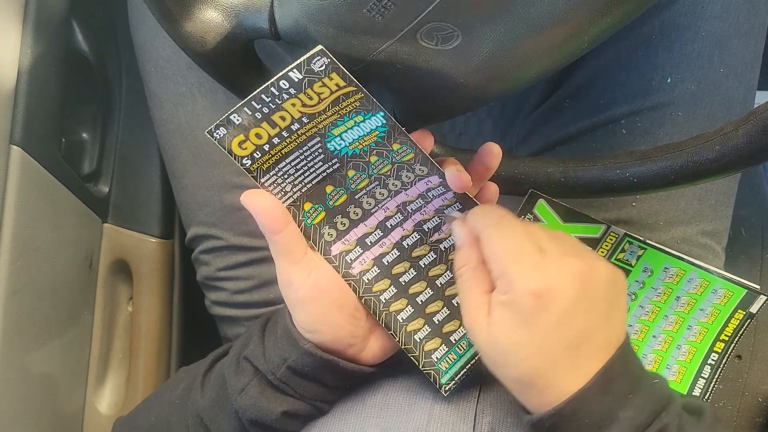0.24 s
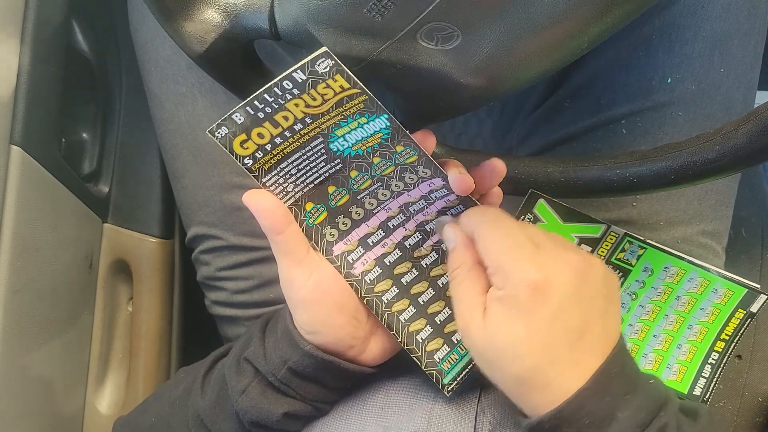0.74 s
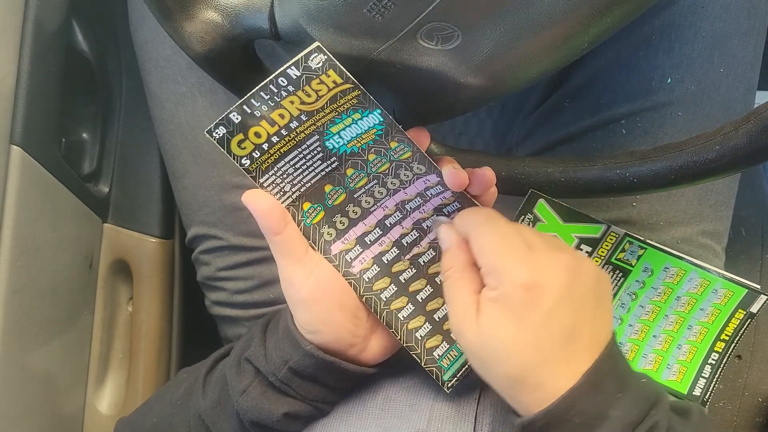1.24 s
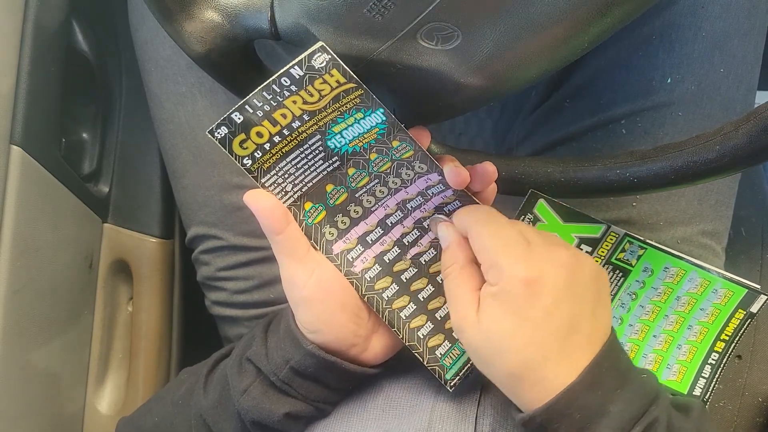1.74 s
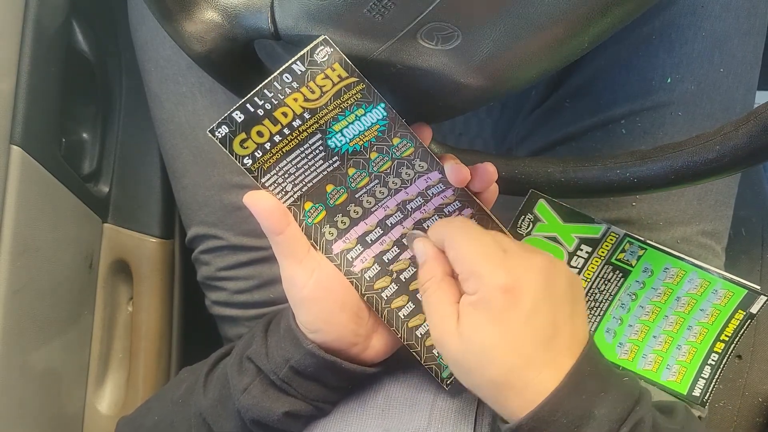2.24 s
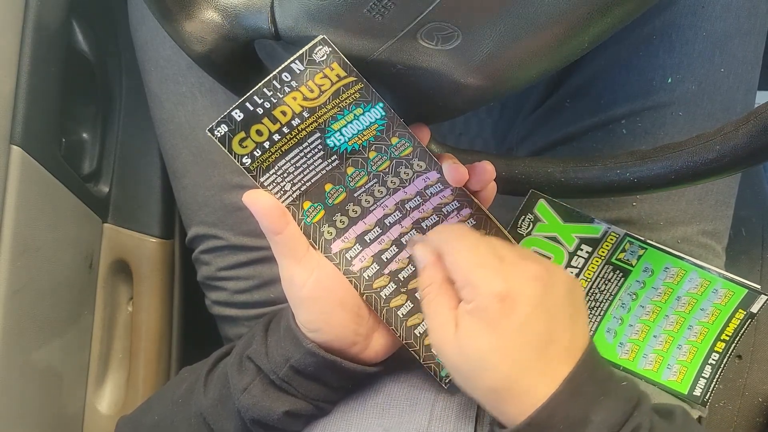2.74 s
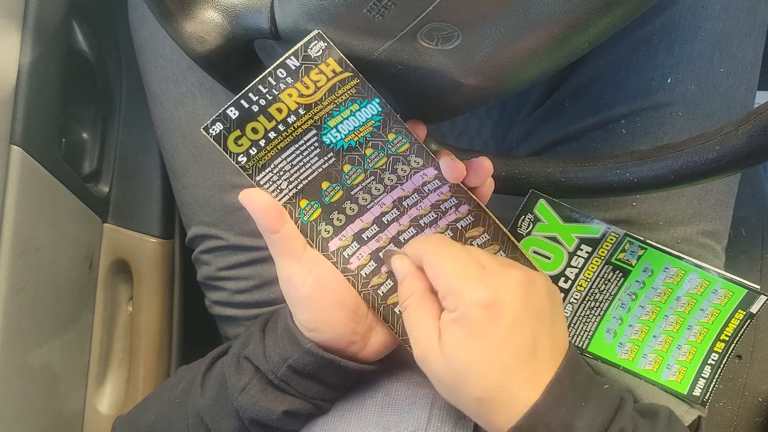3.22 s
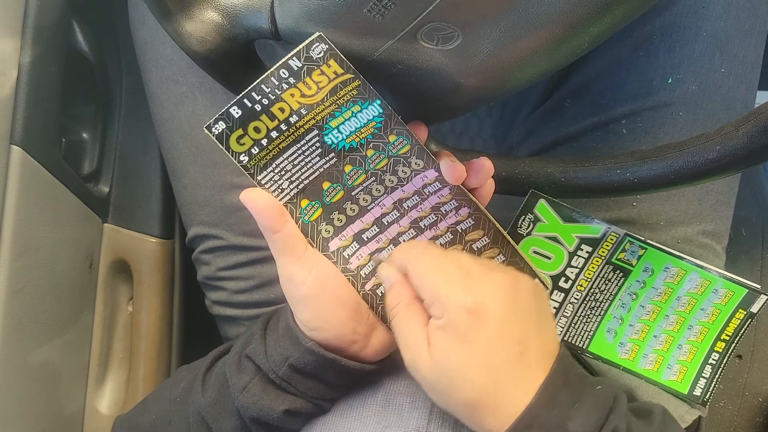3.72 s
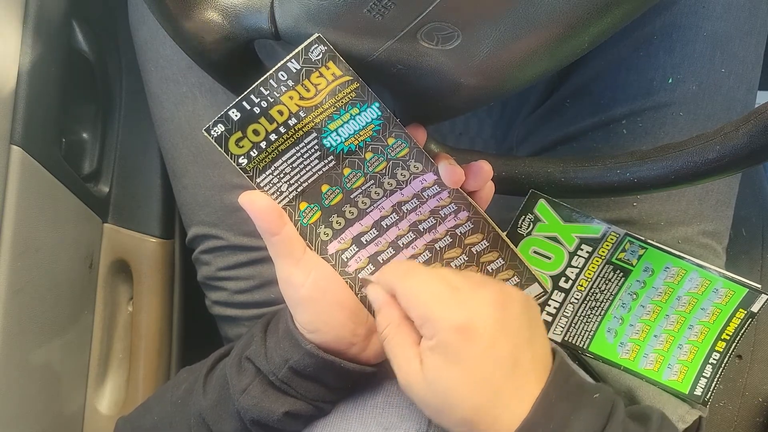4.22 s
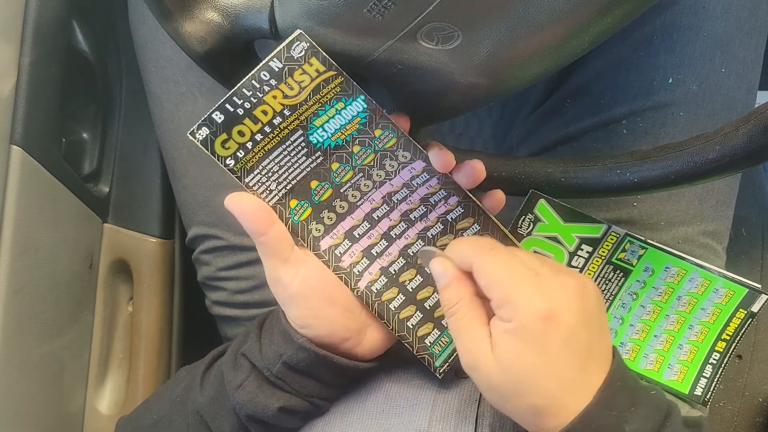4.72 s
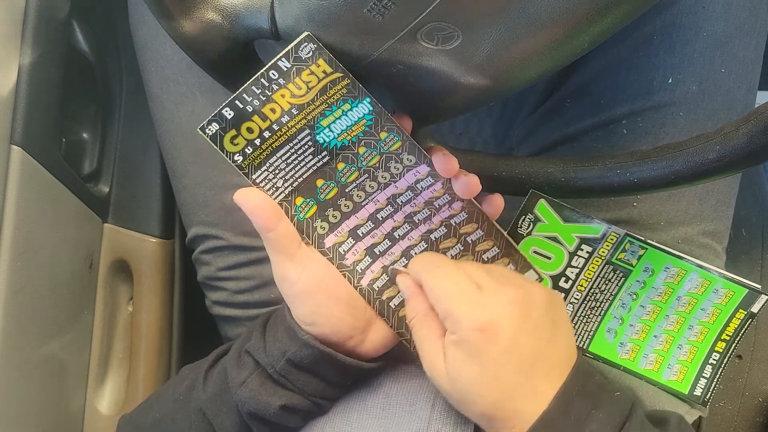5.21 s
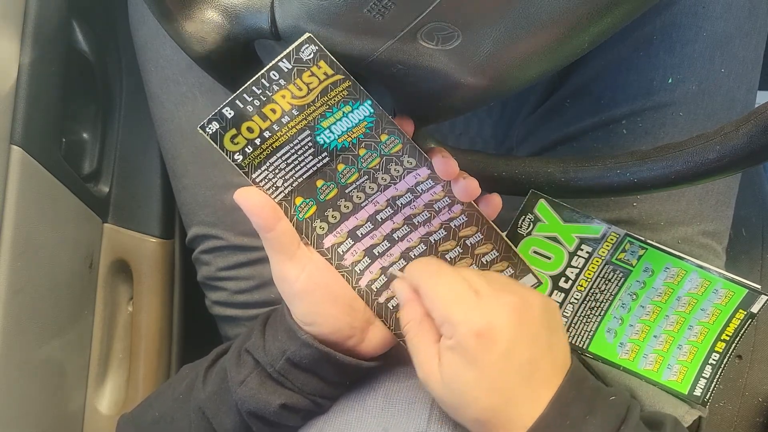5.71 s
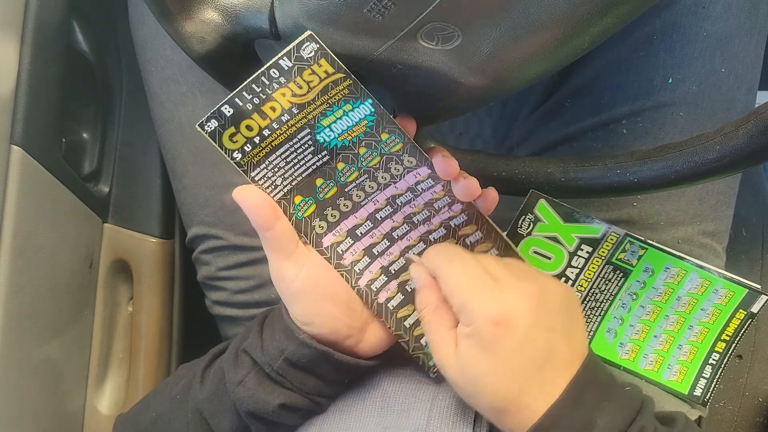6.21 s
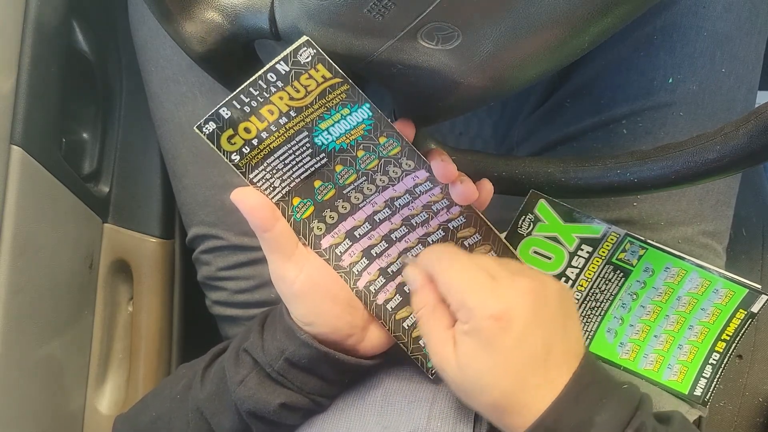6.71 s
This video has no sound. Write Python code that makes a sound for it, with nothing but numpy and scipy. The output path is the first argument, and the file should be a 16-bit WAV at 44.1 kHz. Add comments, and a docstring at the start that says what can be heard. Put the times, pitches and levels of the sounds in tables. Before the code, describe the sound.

Close, dry rasping runs in a fast, even rhythm as an edge rubs to and fro across a hand-held scratch card. The strokes vary in pressure and hiss, and little clicks are scattered among them. After a short break with a few faint taps, the scratching carries on. The microphone is nearby in a small padded car cabin with almost no echo and a continuous low rumble.

```python
"""Quick to-and-fro scratching, about eight strokes a second, on a lottery ticket held in one hand.
The scraping edge sticks and slips on the coating and shakes the card, whose resonances change as the
hand works down it; now and then the edge catches or the card flexes with a tick. Two microphones hear
it inside a parked car: the small padded cabin adds a very short ring, and a low rumble lies beneath."""
import sys
import numpy as np
from scipy import signal
from scipy.fft import rfft, irfft, next_fast_len
from scipy.io import wavfile
from scipy.ndimage import uniform_filter1d

SR = 44100
rng = np.random.default_rng(int(sys.argv[2]) if len(sys.argv) > 2 else 0)


def wav_record(signal):
    """Record a signal, one row per channel, as 16-bit PCM in the file named by sys.argv[1]."""
    frames = np.transpose(np.atleast_2d(signal))
    bounded = np.clip(frames, -1, 1)
    # unit amplitude maps onto the largest positive 16-bit level
    quanta = np.round(bounded * 32767).astype(np.int16)
    wavfile.write(sys.argv[1], SR, quanta)


N = 306495
EVENT_SIZE = 8192  # samples for one stroke or tick
USUAL_DB = -29.5  # crest of an ordinary stroke


# Strokes on the ticket; pushes tend to crest early, hissier pulls late. Each row: start in seconds,
# length in seconds, crest level in dB, place of the crest from 0 to 1, coating hiss in dB.
STROKES = [(0.051, 0.051, -27.5, 0.29, -1.5), (0.157, 0.089, -29, 0.59, -1.5),
           (0.318, 0.056, -30.5, 0.02, -2), (0.433, 0.072, -29, 0.65, 0), (0.566, 0.069, -29, 0.11, -2.5),
           (0.67, 0.097, -27.5, 0.57, 2), (0.819, 0.068, -28, 0.39, -4), (0.924, 0.058, -27, 1, -0.5),
           (1.057, 0.058, -34.5, 0.32, -5.5), (1.15, 0.086, -33, 0.64, -4), (1.287, 0.064, -30.0, 0.32, -1),
           (1.393, 0.084, -32, 0.82, -0.5), (1.531, 0.072, -29, 0.54, -2.5),
           (1.636, 0.078, -30.0, 0.57, -3.5), (1.775, 0.065, -32, 0.44, -1.5),
           (1.877, 0.09, -31, 0.62, -1.5), (2.027, 0.054, -32.5, 0.75, -0.5), (2.115, 0.085, -31.0, 0.7, 1),
           (2.264, 0.069, -30.0, 0.38, -2.5), (2.369, 0.076, -30, 0.72, 4), (2.501, 0.057, -32.5, 0.3, 2),
           (2.622, 0.061, -33, 0.67, 2.5), (2.738, 0.062, -35, 0.32, 1.0), (2.854, 0.068, -32.5, 0.58, 6.5),
           (2.993, 0.058, -34.5, 0.38, 3), (3.092, 0.093, -32.0, 0.41, 5.0),
           (3.244, 0.055, -25.5, 0.35, -1), (3.347, 0.072, -29.5, 0.61, 1),
           (3.472, 0.067, -28.5, 0.14, 1.5), (3.581, 0.07, -29.5, 0.69, 1.5),
           (3.701, 0.06, -26.5, 0.4, -1.5), (3.815, 0.058, -31, 0.56, -1), (3.953, 0.05, -31.5, 0.17, 0),
           (4.049, 0.066, -30, 0.81, -1.0), (4.17, 0.033, -28, 1.0, 1.5), (4.279, 0.066, -33.5, 0.67, 3.5),
           (4.393, 0.042, -29.5, 0.5, 1), (4.49, 0.076, -32.5, 0.66, -3.5), (4.604, 0.017, -35, 0.85, 4),
           (4.744, 0.086, -51, 0.36, 9.5), (5.115, 0.036, -44.5, 0.0, -4),
           (5.238, 0.063, -32.5, 0.26, -4.5), (5.367, 0.057, -33.5, 0.35, 1.5),
           (5.492, 0.054, -28.5, 0.29, -4), (5.604, 0.052, -33.5, 0.24, 1.5),
           (5.715, 0.06, -29.5, 0.52, -4.0), (5.836, 0.036, -30, 0.96, -0.5),
           (5.96, 0.051, -29.5, 0.01, -3.0), (6.077, 0.049, -30.0, 0.74, -1.5),
           (6.194, 0.067, -31, 0.91, -0.5), (6.34, 0.049, -31, 0, 3), (6.442, 0.09, -34.5, 0.72, 3),
           (6.579, 0.047, -30, 0, 5.5), (6.688, 0.071, -34.5, 0.44, 1), (6.817, 0.052, -32.5, 0.59, 3.5)]
def scratching():
    """All strokes, each with its own reflections as hand and card move."""
    out = np.zeros((2, N))
    for stroke in STROKES:
        add(out, stroke[0], cabin(scratch(*stroke)))
    return out


def scratch(s, length, crest_db, crest_place, hiss_db, slow_dull_db=-4.0, fine_hz=4000, run_up_s=0.019,
            edge_hz=3100, edge_width_hz=700, edge_per_db=0.43):
    """One stroke: the edge drags under changing pressure; its fine hiss needs speed, greatest halfway."""
    t, hz = np.arange(EVENT_SIZE) / SR, bins(EVENT_SIZE)
    pressure = edge_pressure(t, length, crest_db, crest_place)
    speed = np.sin(np.pi * np.minimum(t / length, 1))
    force = friction() * pressure
    fine = irfft(rfft(force) / (1 + (fine_hz / hz) ** 8), EVENT_SIZE)
    fine_gain = from_db(slow_dull_db * (1 - speed)) * np.minimum(t / run_up_s, 1)
    force = force - fine + fine * fine_gain
    # the harder the edge digs in, the more its own resonance stands out
    edge_db = edge_per_db * (crest_db - USUAL_DB) * resonance(hz, edge_hz, edge_width_hz)
    card_db = card_response(s, card_body_db(s, crest_db, hiss_db), hiss_db)
    rasp = causal_filter(force, card_db + edge_db)
    return unit_power(rasp) * np.sqrt(np.mean(pressure ** 2))


def edge_pressure(t, length, crest_db, crest_place, bite_s=0.0067, swell_db_s=351, ease_db_s=256,
                  swing_db=11, lift_db_s=855, linger_db=18, linger_db_s=368):
    """The edge bites, presses to a crest, eases and lifts quickly, though a light touch lingers."""
    past_crest, past_end = t - crest_place * length, np.maximum(t - length, 0)
    slack_db = swell_db_s * np.maximum(-past_crest, 0) + ease_db_s * np.maximum(past_crest, 0)
    slack_db = swing_db * np.tanh(slack_db / swing_db)
    lift_db = np.minimum(lift_db_s * past_end, linger_db + linger_db_s * past_end)
    return from_db(crest_db - slack_db - lift_db) * np.minimum(t / bite_s, 1)


def friction(slips_per_s=650, count=400, spread_db=2.5, powder_db=-3, chatter_db=1.9, chatter_per_s=220):
    """Uneven slips of the edge over a fine hiss of crumbling coating."""
    slip_at = (np.cumsum(rng.gamma(2, .5, count)) * SR / slips_per_s).astype(int)
    sizes = from_db(spread_db * np.clip(rng.standard_normal(count), -2, 2))
    slips = np.bincount(slip_at, sizes, EVENT_SIZE)[:EVENT_SIZE]
    force = unit_power(slips - slips.mean()) + from_db(powder_db) * rng.standard_normal(EVENT_SIZE)
    force *= from_db(chatter_db * np.clip(wander(EVENT_SIZE, chatter_per_s), -2, 2))
    # the hand keeps the mean drag steady
    return force / np.sqrt(uniform_filter1d(force ** 2, size=700) + 1e-9)


# How freely the card sounds as the grip shifts. Each row: time in seconds, body level in dB.
GRIP = [(0, 2.5), (1.2, -3.5), (2.03, -4.5), (2.15, 0), (3.05, .5), (3.35, 0.5), (4.45, -3.5), (4.6, 0.5),
        (5.5, 2.5), (6.9, .5)]
def card_body_db(s, crest_db, hiss_db, loss_per_db=0.62, gain_per_hiss_db=0.22):
    """Pressing harder damps the card's body; a light, hissy stroke lets it sound."""
    grip_db = np.interp(s, *np.transpose(GRIP))
    return grip_db - loss_per_db * (crest_db - USUAL_DB) + gain_per_hiss_db * hiss_db


# The broad colour of scraping, right at the card. Each row: frequency in Hz, relative level in dB.
RASP_SPECTRUM = [(120, -37.5), (300, -13.5), (600, -20.5), (1000, -9), (1300, -11.5), (2100, -9.5),
                 (2400, -2), (3400, -4), (4200, -10.5), (4850, -14), (7600, -22.5), (8300, -28),
                 (11000, -28.5), (15500, -28)]
# The card's resonances. Each row: frequency in Hz, undamped width in Hz, then lift in dB when
# scratched at the top, middle and bottom.
CARD_MODES = [(518.5, 30, 11.5, 13.5, 8.5), (731, 75, 8.5, 7.5, 12), (1154, 73, -3.5, 5, 3.5),
              (1505, 122, 10.5, 11, 13), (1793, 187, 13.5, 8.5, 6.5), (2371, 148, 4, 8.5, 2),
              (2662, 134, 8, 4.5, 11.5), (3194, 580, 4, 8.5, 5.5), (4020, 190, 3, 1, -2),
              (4550, 220, 9.5, 1, 3.5), (5170, 350, 11, 2, 2.5), (5400, 300, -0.5, 7.5, 0.5),
              (6780, 270, 3.5, 2.5, 3.5), (12510, 1530, 7, 5, 9.5)]
# Where the hand works. Each row: time in seconds, place on the card from 0 (top) to 2 (bottom).
HAND_PLACE = [(0, 0), (2.4, 0), (3.2, 1), (4.6, 1), (5.2, 2), (6.95, 2)]
def card_response(s, body_db, hiss_db, detune=0.015, vary_db=1.0, body_hz=1900, hiss_hz=3900):
    """The card's colour in dB; the grip shifts its resonances a little on every stroke."""
    hz, place = bins(EVENT_SIZE), np.interp(s, *np.transpose(HAND_PLACE))
    curve_db = at_hz(RASP_SPECTRUM, hz)
    curve_db += body_db / (1 + (hz / body_hz) ** 8) + hiss_db / (1 + (hiss_hz / hz) ** 8)
    for centre, width, *lifts in CARD_MODES:
        centre *= 1 + detune * rng.normal()
        width = max(width, centre / 15)  # fingers damp the card, so nothing rings for long
        lift_db = np.interp(place, np.arange(len(lifts)), lifts) + vary_db * rng.normal()
        curve_db += lift_db * resonance(hz, centre, width)
    return curve_db


# Sharp ticks, right at the card. Each row: start in seconds, peak in dB, card body in dB.
TICKS = [(0.125, -40, 18), (0.197, -16, -14), (0.226, -22.5, -4), (0.367, -21.5, -7.5), (0.576, -21, -2),
         (0.831, -30, -6), (1.202, -20.5, 4), (2.373, -26, -5), (3.252, -22.5, -1), (3.940, -45, -3),
         (3.962, -20, -11), (4.198, -29, -3), (4.4, -25.5, -6.5), (4.549, -28, 16), (4.757, -39.5, -4),
         (4.849, -48, 17), (4.954, -50, 19), (5.121, -35.5, 9), (5.259, -23, -1), (5.973, -21, -1),
         (6.179, -49, 23), (6.325, -43, 7), (6.477, -18, -5)]
def ticks(decay_s=0.0061, hiss_db=-4.0):
    """The edge touches down or catches, or the card flexes: a snap rings the card's resonances."""
    out, t = np.zeros((2, N)), np.arange(EVENT_SIZE) / SR
    for s, peak_db, body_db in TICKS:
        burst = rng.standard_normal(EVENT_SIZE) * np.exp(-t / decay_s)
        snap = causal_filter(burst, card_response(s, body_db, hiss_db))
        add(out, s, cabin(from_db(peak_db) * snap / np.abs(snap).max()))
    return out


# The card from the two microphones. Each row: frequency in Hz, left level over right in dB.
MIC_BALANCE = [(150, -31), (530, 34), (740, -17.5), (950, -10.5), (1130, 12.5), (1700, 3), (2900, 3.5),
               (4200, -5), (5500, 4.5), (7400, -5.5), (8700, -7), (11000, -17), (12300, -0.5), (16000, -5)]
# Phase between the microphones. Each row: frequency in Hz, lead of the left in radians.
MIC_LEAD = [(300, -6.5), (500, -5.5), (680, -5), (850, -3.5), (1100, 4), (1400, 3.5), (1800, 4.5),
            (2200, 4.5), (2800, 4), (4000, 3.5), (7000, 4.5), (9000, 11.5), (12000, 4.5)]
# Sound arriving straight from the card. Each row: frequency in Hz, share of the power from 0 to 1.
DIRECT_SHARE = [(150, .8), (400, .4), (800, .45), (1100, .85), (1600, .92), (3200, .92), (4500, .65),
                (8000, .45), (15000, .4)]
def cabin(x, t60_s=0.035):
    """Direct sound reaches each microphone with its own phase; close glass and trim scatter the rest."""
    size = 2 * EVENT_SIZE
    hz, t = bins(size), np.arange(EVENT_SIZE) / SR
    ring = rng.standard_normal((2, EVENT_SIZE)) * from_db(-60 * t / t60_s)
    scatter = rfft(ring / np.sqrt(np.sum(ring ** 2, axis=1, keepdims=True)), size)
    sides, share = np.array([[1], [-1]]), at_hz(DIRECT_SHARE, hz)
    direct = np.exp(.5j * sides * at_hz(MIC_LEAD, hz))
    pan = np.sqrt(2 / (1 + from_db(-sides * at_hz(MIC_BALANCE, hz)) ** 2))
    paths = np.sqrt(share) * direct + np.sqrt(1 - share) * scatter
    return irfft(rfft(x, size) * pan * paths, size)[:, :EVENT_SIZE]


# Deep sway, drone and hush, all around the microphones. Each row: frequency in Hz, relative level in dB.
SWAY_SPECTRUM = [(15, -43), (25, -3.5), (38, 0.5), (46, 5), (54, -0.5), (62, 0.5), (80, -38), (150, -95)]
DRONE_SPECTRUM = [(35, -71), (55, 3.5), (64, 1), (80, 2), (97, 2.5), (112, 2.5), (135, -11), (165, -10),
                  (250, -28.5), (600, -71)]
HUSH_SPECTRUM = [(90, -43), (150, -13), (330, -9), (600, -16.5), (850, -15.5), (1200, -23.5), (2100, -31.5),
                 (2800, -26.5), (5000, -39.5), (8500, -47.5), (12500, -42), (16000, -42)]
# The rumble in the cabin. Each row: time in seconds, then sway and drone in dB before their trims.
RUMBLE_LEVELS = [(0.1, -48, -45.5), (0.21, -44, -47.5), (2.45, -42, -48), (5.08, -51, -48.5),
                 (5.4, -49, -47.5), (5.65, -53.5, -50), (6.76, -45, -48.5), (6.85, -55, -48)]
def rumble_and_hush(sway_trim_db=0.9, drone_trim_db=1.56, sway_heave_db=0.64, drone_heave_db=0.35,
                    heaves_per_s=6.7, hush_db=-60, left_db=1.0):
    """Low rumble comes through the car body, heaving slightly at random, over the cabin's faint hush."""
    times, *levels = np.transpose(RUMBLE_LEVELS)
    sway_db, drone_db = [np.interp(np.arange(N) / SR, times, level) for level in levels]
    sway_db += sway_trim_db + sway_heave_db * wander(N, heaves_per_s)
    sway = from_db(sway_db) * cabin_noise(SWAY_SPECTRUM)
    drone_db += drone_trim_db + drone_heave_db * wander(N, heaves_per_s)
    drone = from_db(drone_db) * cabin_noise(DRONE_SPECTRUM)
    hush = from_db(hush_db) * cabin_noise(HUSH_SPECTRUM)
    return (sway + drone + hush) * from_db([[left_db], [-left_db]])


# The background at the two microphones. Each row: frequency in Hz, likeness from 0 to 1.
MIC_LIKENESS = [(30, .99), (60, .97), (130, .95), (250, .6), (500, .35), (1500, .3), (12000, .1)]
def cabin_noise(spectrum):
    """Steady noise of unit power, alike at both microphones in the bass."""
    size = next_fast_len(N)
    hz = bins(size)
    mid, side = rfft(rng.standard_normal((2, size)))
    alike = at_hz(MIC_LIKENESS, hz)
    pair = np.sqrt(1 + alike) * mid + np.sqrt(1 - alike) * side * [[1], [-1]]
    colour = from_db(at_hz(spectrum, hz)) * (hz < 2 * spectrum[-1][0])
    return unit_power(irfft(pair * colour, size)[:, :N])


def causal_filter(x, curve_db):
    """Minimum-phase filter: resonances ring after the blow, never before."""
    size = len(x)
    cepstrum = irfft(np.log(from_db(curve_db)), size)
    cepstrum[1:size // 2] *= 2
    cepstrum[size // 2 + 1:] = 0
    return irfft(rfft(x) * np.exp(rfft(cepstrum)), size)


def resonance(hz, centre, width):
    """A peak of height one."""
    return 1 / (1 + (2 * (hz - centre) / width) ** 2)


def from_db(db):
    """Decibels to gain."""
    return 10 ** (np.asarray(db) / 20)


def unit_power(x):
    """Scale to a mean square of one."""
    return x / np.sqrt(np.mean(x ** 2) + 1e-20)


def bins(size):
    """Frequencies of a real transform, in Hz."""
    return np.maximum(np.arange(size // 2 + 1) * SR / size, 1)


def at_hz(points, hz):
    """Read a table on a log-frequency axis."""
    freqs, values = np.transpose(points)
    return np.interp(np.log(hz), np.log(freqs), values)


def wander(size, turns_per_s):
    """Random drift with a spread of about one."""
    position = np.arange(size) / SR * turns_per_s
    return 1.2 * np.interp(position, np.arange(size), rng.standard_normal(size))


def add(track, s, sound):
    """Mix a stereo sound in at s seconds."""
    start = int(np.clip(s * SR, 0, N - 1))
    track[:, start:start + EVENT_SIZE] += sound[:, :N - start]


def scene():
    """The ticket in the cabin, over the rumble."""
    return scratching() + ticks() + rumble_and_hush()


def record(dry, cutoff_hz=15800):
    """Both microphone channels lose the highest treble in a steep cut."""
    return signal.sosfiltfilt(signal.ellip(10, .05, 60, cutoff_hz, fs=SR, output="sos"), dry)


dry = scene()
out = record(dry)
wav_record(out)
```